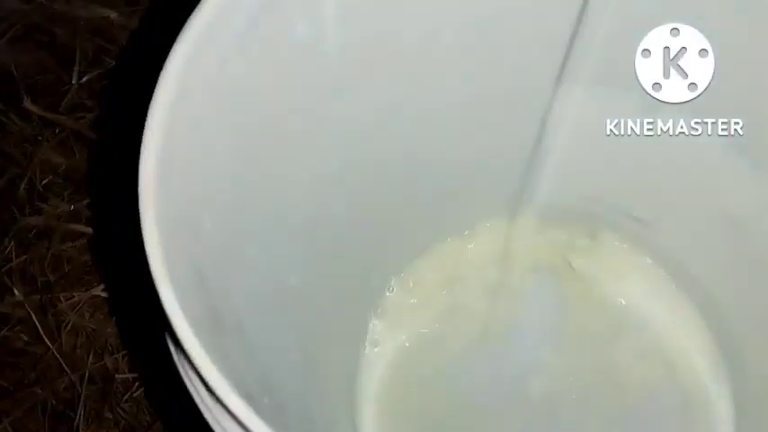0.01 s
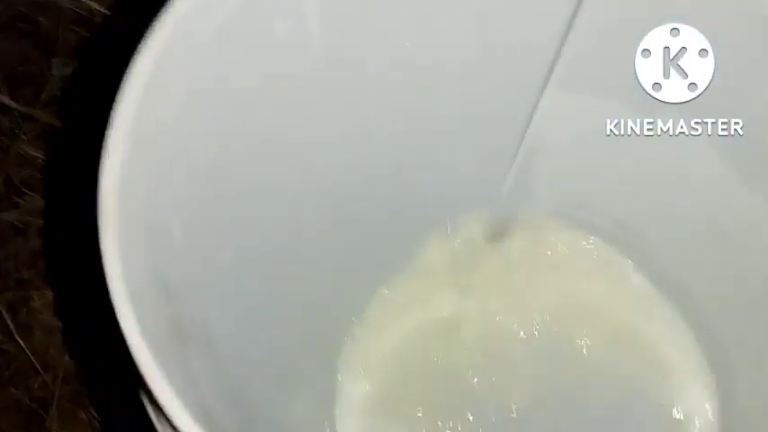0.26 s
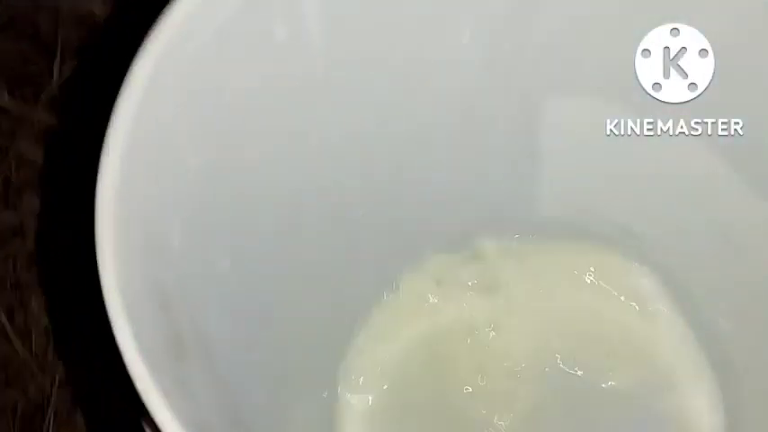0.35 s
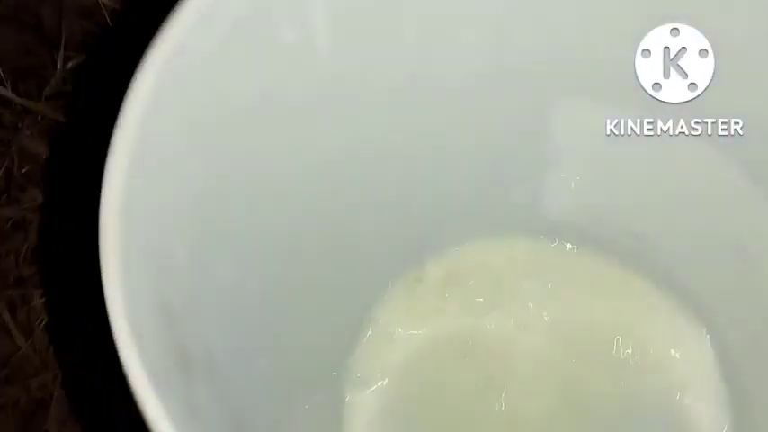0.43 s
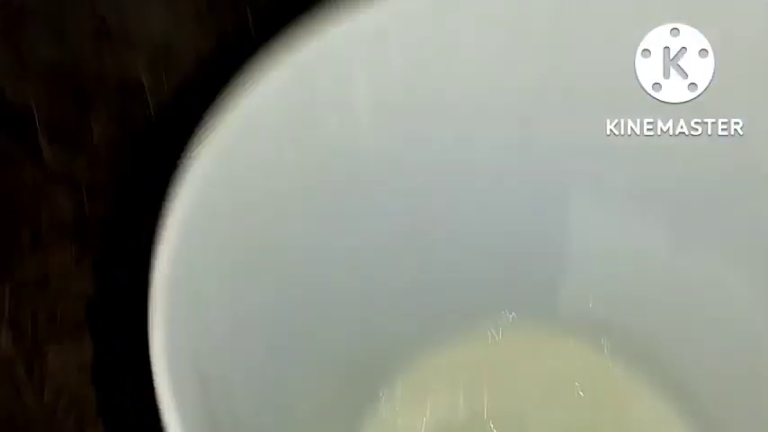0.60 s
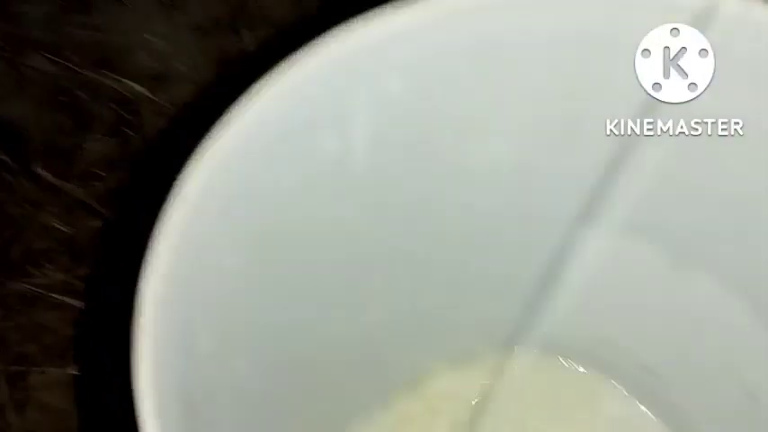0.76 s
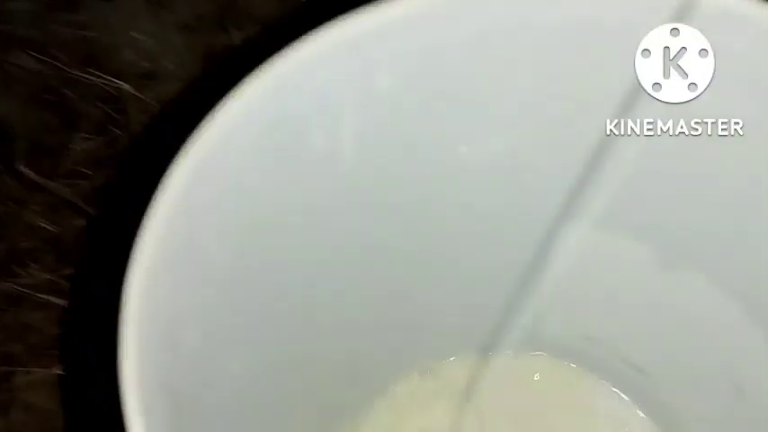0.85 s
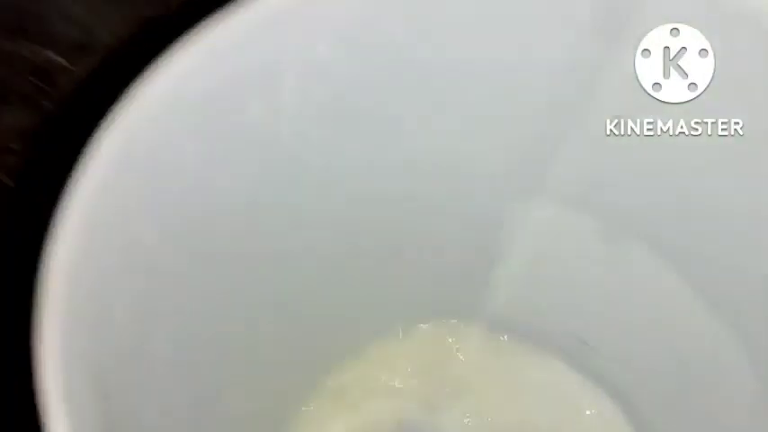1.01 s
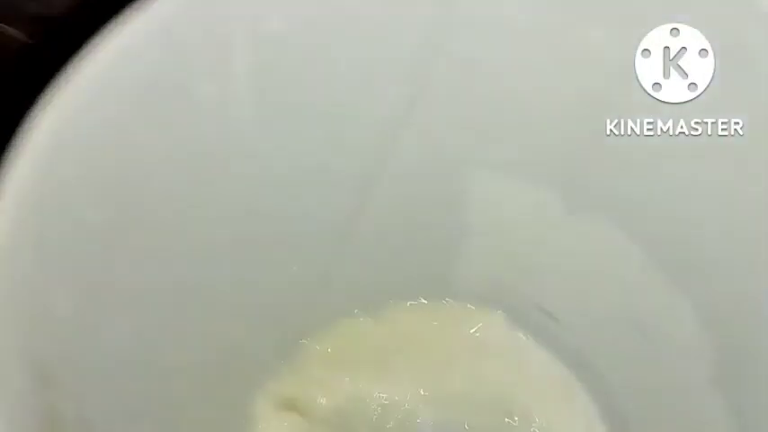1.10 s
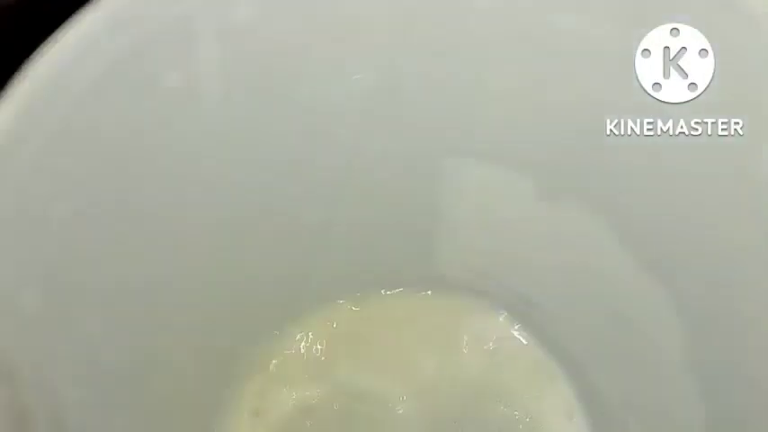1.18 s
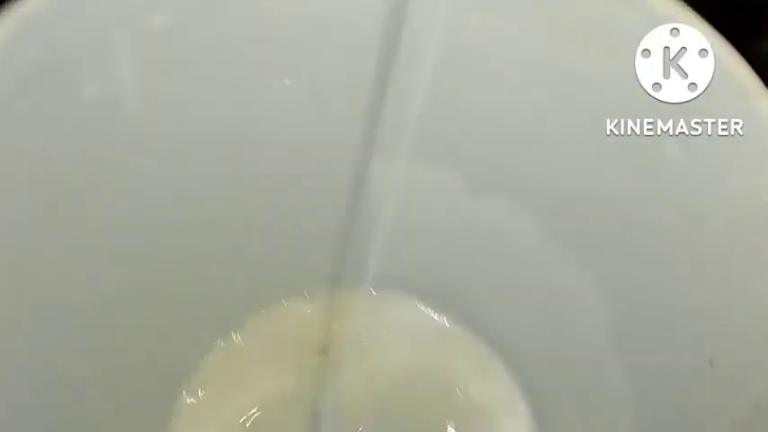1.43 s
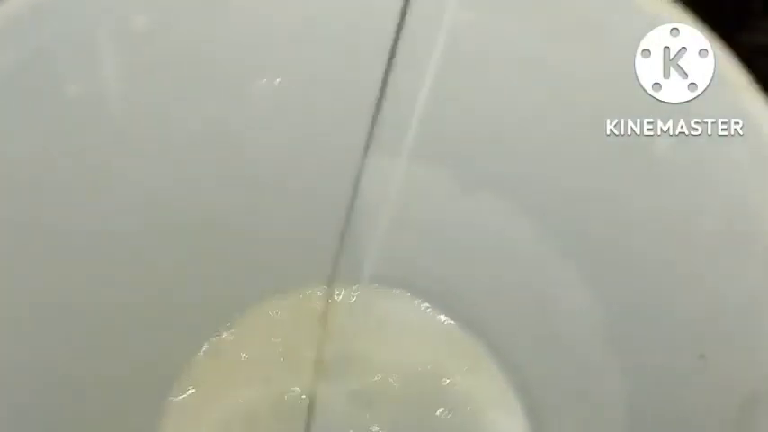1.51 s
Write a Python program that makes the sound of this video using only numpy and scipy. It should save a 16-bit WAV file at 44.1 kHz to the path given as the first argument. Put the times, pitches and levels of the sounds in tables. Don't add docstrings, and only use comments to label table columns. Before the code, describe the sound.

Milk squirting by hand into a bucket: two wet, frothy spurts with sputtering drops between them

```python
import sys
import numpy as np
from scipy import signal
from scipy.fft import rfft, irfft, next_fast_len
from scipy.io import wavfile
from scipy.ndimage import uniform_filter1d, map_coordinates

SR = 44100
rng = np.random.default_rng(int(sys.argv[2]) if len(sys.argv) > 2 else 0)


def boost_factor(decibels):
    exponent = np.asarray(decibels, float) / 20
    return 10 ** exponent


def unload_audio(sound):
    columns = np.transpose(np.atleast_2d(sound))
    steps = np.round(np.clip(columns, -1, 1) * 32767)
    wavfile.write(sys.argv[1], SR, steps.astype(np.int16))


N = 68355


def unit(x):
    return x / np.sqrt(np.mean(x ** 2) + 1e-20)


def even(x):
    return unit(x / np.sqrt(abs(uniform_filter1d(x ** 2, size=SR // 25)) + 1e-9))


def along(points, hz):
    f, v = np.transpose(points)
    return np.interp(np.log(hz + 1), np.log(f + 1), v)


def wobble(rate):
    return map_coordinates(rng.standard_normal(int(N * rate / SR) + 4), [np.arange(N) * rate / SR])


def filtered(x, response):
    m = next_fast_len(N + SR // 2)
    return irfft(rfft(x, m) * response(np.fft.rfftfreq(m, 1 / SR)), m)[..., :N]


def steep(hz):
    return lambda f: (-f * f / (hz * hz - f * f + 1.2j * f * hz)) ** 2


def resonant(modes):
    def response(f):
        return sum((-1) ** k * boost_factor(db) * 1j * f * w / (c * c - f * f + 1j * f * w)
                   for k, (c, w, db) in enumerate(modes))
    return response


def chirps(s, hz, cycles, rise, gain, size=700):
    t = np.arange(size) / SR
    u = t * hz[:, None] / cycles
    tone = np.sin(2 * np.pi * cycles * (u + rise * u * u / 2))
    wave = gain[:, None] * tone * np.exp(-3 * u) * (1 - np.exp(-u * 20))
    at = (s * SR).astype(int)[:, None] + np.arange(size)
    return np.bincount(at.ravel(), wave.ravel(), N + size)[:N]


def flecks(per_s, size_db):
    chance, sign, size = rng.random((3, N))
    return (chance < per_s / SR) * np.sign(sign - .5) * boost_factor(-size_db * np.log(size + 1e-6))


def ports(pair, alike):
    def turn(hz):
        return np.arccos(np.clip(along(alike, hz), -1, 1)) / 2
    mid, side = filtered(pair, lambda hz: np.array([np.cos(turn(hz)), np.sin(turn(hz))]))
    return np.array([mid + side, mid - side])


def controls(jet_tables):
    t, gain = np.arange(N) / SR, 0
    for table in jet_tables:
        s, db, *_ = np.transpose(table)
        dying_db = 60 * np.maximum(t - s[-1], 0) / 0.088
        gain = gain + (t >= s[0]) * boost_factor(np.interp(t, s, db) - dying_db)
    rows = np.concatenate(jet_tables)
    return [gain, *[np.interp(t, rows[:, 0], column) for column in rows[:, 2:].T]]


# [f/Hz, level/dB per Hz]
SHED_COLOUR = [(25, -2), (70, -25), (200, -18), (370, -17.5), (550, -27), (2000, -36), (9000, -41.5),
               (15000, -42)]
# [f/Hz, likeness -1 to 1]
SHED_ALIKE = [(40, .2), (150, 0.18), (400, 0.21), (1500, .1)]
# [t/s, level/dB, length/s]
HAND_BUMPS = [(0.15, -56.5, .04), (.185, -55.5, .05), (0.232, -56, .04), (0.294, -69, .03),
              (0.426, -60, .03), (0.576, -72, .04), (0.693, -54.5, 0.043), (0.75, -62, .03),
              (0.914, -55.5, .025), (1.19, -63, .03), (1.393, -59, .02), (1.523, -60, .04)]


def shed():
    pair = filtered(rng.standard_normal((2, N)), lambda f: boost_factor(along(SHED_COLOUR, f)))
    murmur = boost_factor(-55 + 0.81 * wobble(18)) * unit(ports(pair, SHED_ALIKE))
    rumble_hz = 120
    air = unit(filtered(rng.standard_normal((2, N)), lambda f: f / (f + 25) / (1 + (f / rumble_hz) ** 4)))
    lumps = boost_factor(-61.5 + 2.2 * wobble(9) + 2 * np.array([wobble(15), wobble(15)]))
    s, db, length = np.transpose(HAND_BUMPS)[:, :, None]
    bumps = (boost_factor(db - 1) * np.exp(-((np.arange(N) / SR - s) / length * 1.76) ** 2)).sum(axis=0)
    return murmur + lumps * air + bumps * (air + 0.43 * air[::-1])


# [t/s, level/dB, usual bubble f/Hz]
TRAPPED_AIR = [
    [(.183, -55, 1550), (.203, -38.5, 960), (.216, -26.5, 1070), (.318, -21.5, 1344), (.41, -26, 1576),
     (.482, -37, 1242), (.492, -45.5, 1416), (.632, -52, 1560), (.65, -77, 1260)],
    [(.889, -43.5, 1100), (.906, -33, 1120), (.945, -24.5, 1490), (1.154, -28, 1500), (1.206, -25.5, 1374),
     (1.26, -32, 1180), (1.312, -45.5, 1060), (1.325, -50, 1670), (1.43, -67, 1420)],
]
# [f/Hz, width/Hz, level/dB]
HOLLOW_MODES = [(789, 66, -2), (1077, 46, -4), (1347, 163, -1)]
# [t/s, level/dB over the trapped air]
HOLLOW_LEVEL = [
    (.3, -21.5),
    (.45, -5.5),
    (.95, -5.5),
    (1.25, -5.5),
]
# [f/Hz, likeness -1 to 1]
BUCKET_ALIKE = [(60, -0.12), (180, 0.39), (650, 1), (1650, 0.086), (4970, -0.22), (15000, 0.053)]


def hollow():
    gain, modes = controls(TRAPPED_AIR)[0], resonant(HOLLOW_MODES)
    sing = filtered(rng.standard_normal((2, N)), lambda f: modes(f) ** 2)
    level_db = np.interp(np.arange(N) / SR, *np.transpose(HOLLOW_LEVEL))
    return gain * boost_factor(level_db) * unit(ports(sing, BUCKET_ALIKE))


# [t/s, peak level/dB, f/Hz]
DROP_TICKS = [(0.137, -35.5, 2730), (0.14, -44, 1360), (0.168, -46, 1660), (.638, -37, 3100),
              (0.682, -34, 1910), (0.6947, -31, 3740), (0.7157, -38, 3660), (0.7157, -45, 2000),
              (0.738, -40, 6500), (0.858, -50, 2010), (0.878, -47, 1650), (0.549, -27, 1400),
              (.522, -27, 1930), (1.303, -19.5, 5600), (1.33, -24, 6100), (1.343, -18, 5900),
              (1.366, -29, 5460), (1.405, -33, 4700), (0.906, -21.5, 1070), (1.391, -51, 1380),
              (1.411, -40, 1090), (1.443, -33.5, 2980), (1.455, -32.5, 3020)]


def ticks():
    s, db, hz = np.transpose(DROP_TICKS)
    return chirps(s, hz, 4.5, 0.04, boost_factor(db + 2.5))


# [t/s, peak level/dB, f/Hz]
LARGE_BUBBLES = [(.207, -27, 773), (.229, -17.5, 934), (0.253, -25, 1030), (0.28, -20.5, 930),
                 (.305, -17, 856), (0.963, -16, 1386), (0.98, -45, 1410), (1.046, -16, 1230),
                 (1.119, -17.5, 1237), (1.177, -18, 1480), (1.201, -23, 1356), (0.371, -21, 1350),
                 (.345, -15, 1315), (.4, -25.5, 1096), (.212, -26, 893), (.39, -21.5, 1080)]
# [t/s, peak level/dB, f/Hz]
SLACKENING = [
    (.402, -28, 2440),
    (.414, -14, 2130),
    (0.423, -13.5, 1830),
    (0.435, -22.5, 1240),
]


def gulps():
    s, db, hz = np.transpose(LARGE_BUBBLES)
    large = chirps(s, hz, 28, 0.0068, boost_factor(db), size=1500)
    s, db, hz = np.transpose(SLACKENING)
    return large + chirps(s, hz, 20, 0.015, boost_factor(db), size=1500)


# [t/s, peak level/dB]
FIRST_SLAPS = [
    (0.186, -20),
    (0.893, -17.5),
]


def slaps():
    out, t = np.zeros(N), np.arange(500) / SR
    for at, level_db in FIRST_SLAPS:
        out[round(at * SR):][:len(t)] += boost_factor(level_db - 60 * t / 0.0017) * rng.standard_normal(len(t))
    return out


def drops():
    return filtered(ticks() + gulps() + slaps(), steep(550))


# [t/s, spatter level/dB, mist level/dB, 60 dB decay/s]
BROKEN_BITS = [(.017, -72, -58, 0.0076), (.088, -77, -62, 0.01), (.136, -66, -62, 0.018),
               (.408, -37.5, -45, 0.013), (.428, -28, -28, 0.021), (0.436, -37, -26, 0.016),
               (0.45, -22, -30, 0.016), (0.463, -39, -24, 0.011), (0.4748, -44, -31, 0.015),
               (.494, -50, -40, .015), (.543, -55, -47, .01), (0.577, -42, -47, 0.03),
               (.679, -56, -51.5, .02), (.687, -53, -54, 0.012), (0.693, -56, -60, .03),
               (0.702, -58, -54, 0.021), (.709, -56, -55, 0.011), (0.715, -45.5, -52, 0.0066),
               (.724, -52.5, -47, .006), (0.7364, -52, -56, .01), (.743, -57, -58, .008),
               (.78, -58.5, -62.5, .01), (0.854, -71, -59, 0.014), (.862, -68, -67, .01),
               (1.252, -31, -42, 0.0099), (1.273, -46, -44.5, 0.0102), (1.304, -33, -39, 0.018),
               (1.329, -38.5, -39, .02), (1.342, -30.5, -51, 0.016), (1.357, -46, -46, .008),
               (1.362, -38, -44, .012), (1.372, -55, -38, 0.0091), (1.384, -49, -43, 0.013),
               (1.403, -52, -60, .015), (1.414, -67, -47, .008), (1.42, -62, -42.5, .008),
               (1.442, -46, -45, .006), (1.452, -60, -53.5, .008)]
# [f/Hz, level/dB per Hz]
SPATTER_COLOUR = [(1500, -46.5), (3000, -11.5), (4500, 2.5), (6000, 0), (7200, -4), (9500, -9.5),
                  (11500, -18.5)]
# [f/Hz, level/dB per Hz]
MIST_COLOUR = [(6000, -25.5), (9000, 1.5), (11000, 5.5), (12500, 4), (14800, 3), (16000, -12)]


def sputters():
    def hiss(colour):
        return unit(filtered(rng.standard_normal((2, N)), lambda f: boost_factor(along(colour, f))))
    s, spatter_db, mist_db, t60 = np.transpose(BROKEN_BITS)[:, :, None]
    after = np.maximum(np.arange(N) / SR - s, 0)
    decay = boost_factor(-60 * np.minimum(after / t60, 4))
    shape = decay * (1 - np.exp(-after / 0.00073)) * (after < .1)
    spatter = hiss(SPATTER_COLOUR) * (boost_factor(spatter_db) * shape).sum(axis=0)
    return spatter + hiss(MIST_COLOUR) * (boost_factor(mist_db) * shape).sum(axis=0)


# [t/s, spatter level/dB, mist level/dB over the spatter]
JET_SPRAY = [
    [(.182, -33, -14), (.188, -39, 1), (.262, -28, -10.5), (.45, -34, -7), (.484, -39.5, -0.5),
     (.491, -49.5, 1.5), (.59, -46.5, -5), (.635, -62.5, 4), (.65, -80, -12)],
    [(.889, -72, 8), (.893, -45.5, 12), (.944, -33, -6.5), (1.12, -28.5, -7), (1.23, -35, -24),
     (1.27, -44, -12), (1.35, -46.5, 0), (1.385, -56, -7), (1.41, -69, -9)],
]


def spray():
    gain, mist_db = controls(JET_SPRAY)
    spatter = even(filtered(flecks(9000, 3), lambda f: boost_factor(along(SPATTER_COLOUR, f))))
    mist = unit(filtered(flecks(5800, 3.34), lambda f: boost_factor(along(MIST_COLOUR, f))))
    return gain * (spatter * boost_factor(0.22 * wobble(90)) + mist * boost_factor(mist_db + 1.3 * wobble(73)))


# [f/Hz, level/dB per Hz]
FROTH_COLOUR = [(450, -17.5), (620, -3.5), (800, -7.5), (1350, -6.5), (2200, 1), (3500, -2.5),
                (5000, -18.5)]


def gurgle():
    gain, pitch_hz = controls(TRAPPED_AIR)
    bubbles_per_s, largest_hz, spread = 2000, 712, 0.453
    u, z = rng.random((3000, 2)), rng.standard_normal(3000)
    s = np.cumsum(-np.log(u[:, 0] + 1e-9)) / bubbles_per_s
    keep = s < (N - 1) / SR
    s = s[keep]
    hz = pitch_hz[(s * SR).astype(int)] * np.exp(spread * z[keep])
    hz = np.clip(hz, largest_hz, 8000)
    loudness = (hz / 1000) ** 0.77 * boost_factor(-3.5 * np.log(u[keep, 1] + 0.0066))
    bubbles = unit(chirps(s, hz, 7.86, 0.1, loudness))
    churn = unit(filtered(flecks(4000, 2.7), lambda f: boost_factor(along(FROTH_COLOUR, f))))
    froth = even(filtered(bubbles + boost_factor(2.0) * churn, steep(673)))
    return gain * boost_factor(.6 * wobble(120)) * froth


# [t/s, level/dB]
JET_PUSH = [
    [(0.14, -77), (0.226, -31.5), (0.416, -42.5), (0.475, -29.5), (0.5, -50.5), (0.592, -42), (0.704, -72),
     (0.764, -56.5), (0.8, -87.5)],
    [(0.87, -103), (0.89, -53), (0.916, -37), (1.108, -43.5), (1.25, -36.5), (1.316, -38.5), (1.358, -57.5),
     (1.484, -55), (1.55, -80)],
]
# [f/Hz, width/Hz, level/dB]
AIR_COLUMN = [(175, 17, -10.5), (221, 14, -10), (302.5, 27.7, -0.5)]
# [t/s, peak level/dB, f/Hz]
BASE_THUMPS = [
    (.505, -6, 245),
    (.893, -3, 185),
    (1.25, 0, 320),
    (1.318, -6, 165),
    (.575, -8, 350),
]


def drumming():
    drum, = controls(JET_PUSH)
    column, floor = resonant(AIR_COLUMN), steep(174.5)
    boom = even(filtered(flecks(2500, 3.34), lambda f: column(f) * floor(f) / (1 + (1j * f / 400)) ** 2))
    s, db, hz = np.transpose(BASE_THUMPS)
    thumps = chirps(s, hz, 7.2, .02, boost_factor(db - 29.5), size=4000)
    return drum * boost_factor(1.7 * wobble(25.3)) * boom + thumps


def jets():
    return boost_factor(0.81 * wobble(32)) * (spray() + gurgle())


# [f/Hz, width/Hz, level/dB]
WALL_MODES = [(787.5, 14, -4.5), (868, 7, 3), (1080, 11, 9), (1283, 13, 10.5), (1397, 52, 5.5),
              (1721, 47, 9), (2000, 45, 2), (2088, 158, -11.5), (2694, 63, -7), (3467, 73, 6.5),
              (781, 80, -0.5), (1306, 160, -1), (5320, 150, -7), (6450, 58, 7)]
# [f/Hz, left over right level/dB]
LEAN = [(60, -5), (130, 16.5), (290, -42), (640, -3), (1410, -2), (3100, 2.5), (6820, -5), (15000, 11.5)]


def bucket(x):
    wander_s, echo_t60_s, lag_s = .035, .025, 0.00013
    wall = resonant(WALL_MODES)

    def ringing(f):
        return 1 + boost_factor(-2) * wall(f)
    usual = np.sqrt(np.mean(abs(ringing(np.linspace(600, 7000, 500))) ** 2))
    x = np.pad(filtered(x, lambda f: ringing(f) / usual), SR // 5)
    t, hop = np.arange(SR // 12) / SR, round(wander_s * SR)
    fade = np.sin(np.pi * np.arange(2 * hop) / (2 * hop))
    pair = np.zeros((2, len(x) + SR))
    for at in range(0, len(x) - 2 * hop, hop):
        paths = rng.standard_normal((2, len(t))) * boost_factor(-60 * t / echo_t60_s)
        paths[0, 0] += 10
        z = rfft(paths)
        z = z / np.sqrt(uniform_filter1d(abs(z) ** 2, size=7, axis=1))
        paths = irfft(z, len(t))[:, :len(t) // 2]
        paths = paths / np.linalg.norm(paths, axis=1)[:, None]
        heard = signal.fftconvolve((x[at:at + 2 * hop] * fade)[None], paths, axes=1)
        pair[:, at:at + heard.shape[1]] += heard
    side = np.array([[.5], [-.5]])
    both = ports(pair[:, SR // 5:][:, :N], BUCKET_ALIKE)
    return filtered(both, lambda f: boost_factor(side * along(LEAN, f)) * np.exp(-2j * np.pi * f * (.5 - side) * lag_s))


# [t/s, left over right level/dB]
JET_AIM = [
    (.5, 1.5),
    (.9, -1.5),
    (1.25, -2.5),
    (1.4, 2),
]


def scene():
    background = shed() + hollow()
    drop, bits = drops(), sputters()
    near = bucket(jets() + boost_factor(-4.0) * drop + boost_factor(0.5) * bits[0])
    near = near + boost_factor(-10) * np.array([drop, np.roll(drop, shift=6)]) + boost_factor(-1.5) * bits
    aim_db = np.interp(np.arange(N) / SR, *np.transpose(JET_AIM))
    return near * boost_factor([aim_db / 2, -aim_db / 2]) + drumming() * boost_factor([[.3], [-.3]]) + background


def band_limit(x):
    return signal.sosfilt(signal.butter(12, 16740, fs=SR, output="sos"), x)


# [f/Hz, width/Hz, depth 0-1]
CASE_NOTCHES = [(8450, 600, .93), (10900, 550, .8)]


def record(dry):
    top_hz = 15780

    def case(f):
        notches = [1 - depth / (1 + ((f - c) / w) ** 2) for c, w, depth in CASE_NOTCHES]
        return np.prod(notches, axis=0) * np.clip((top_hz + 150 - f) / 400, 0, 1)
    return band_limit(filtered(dry, case))


dry = scene()
out = record(dry)
unload_audio(out)
```